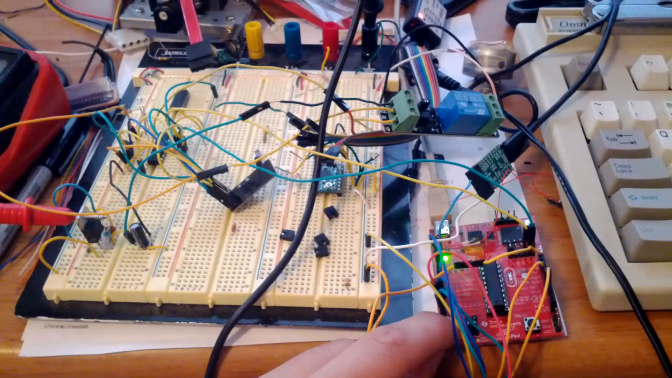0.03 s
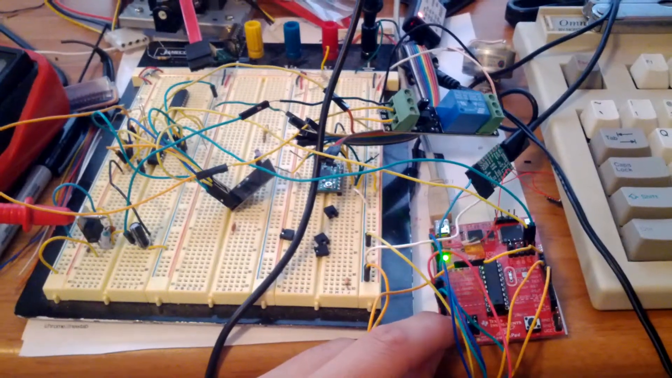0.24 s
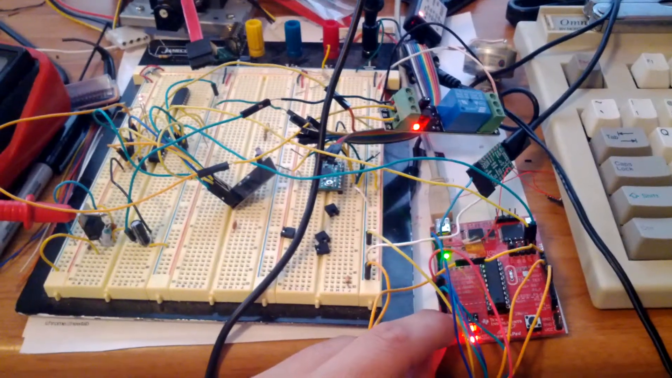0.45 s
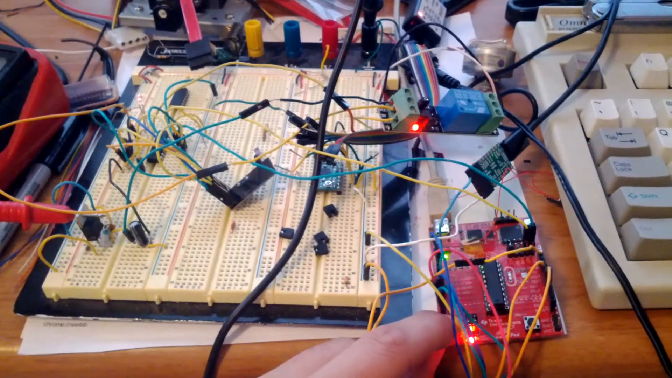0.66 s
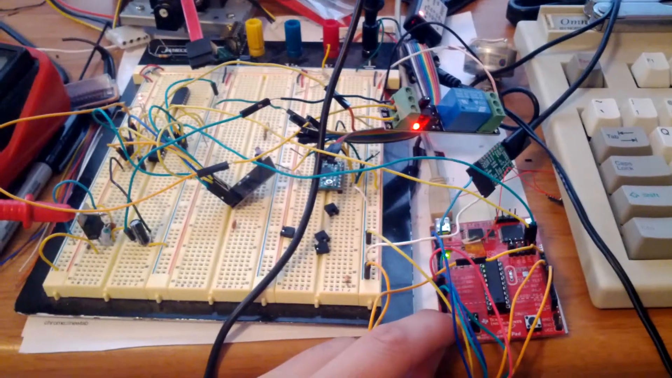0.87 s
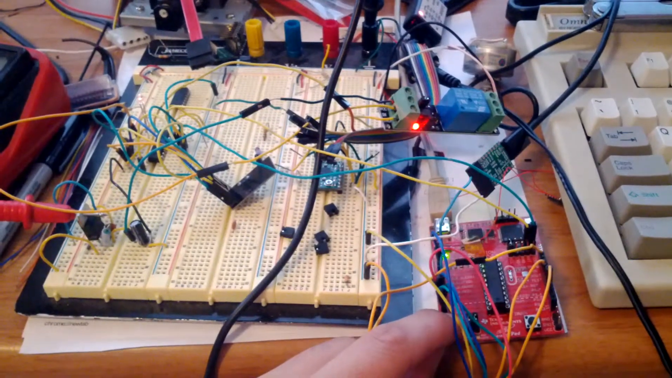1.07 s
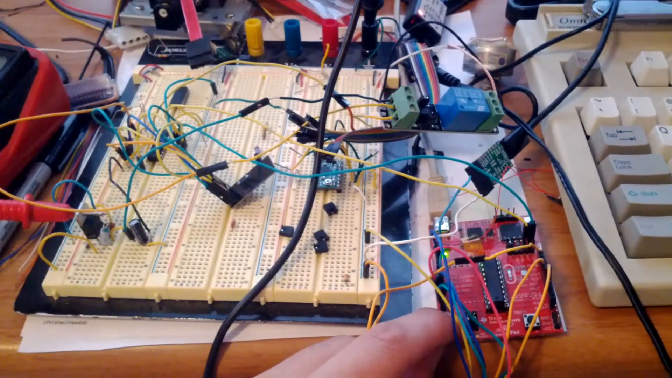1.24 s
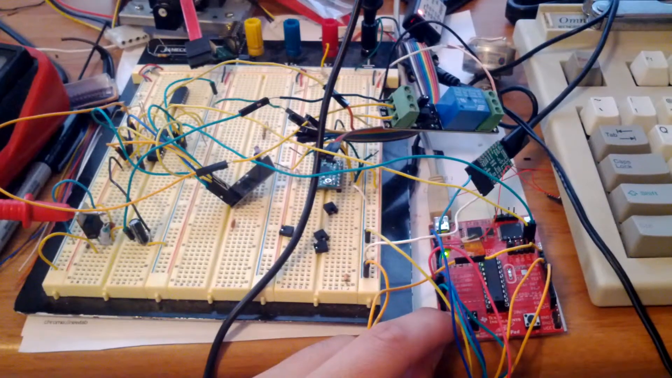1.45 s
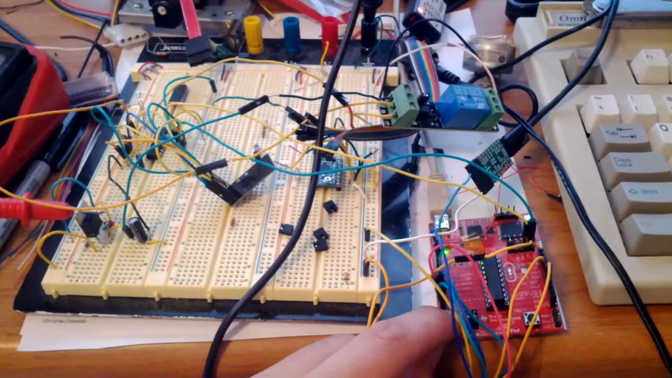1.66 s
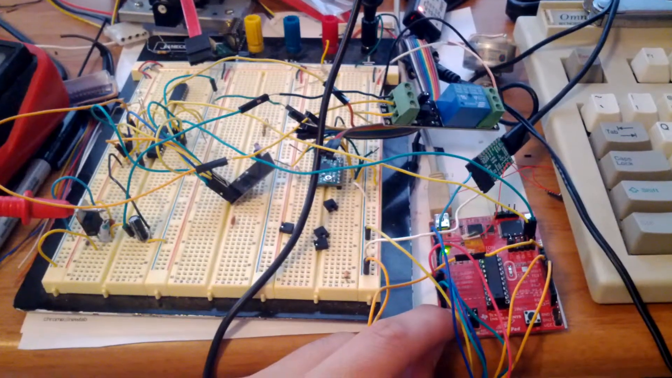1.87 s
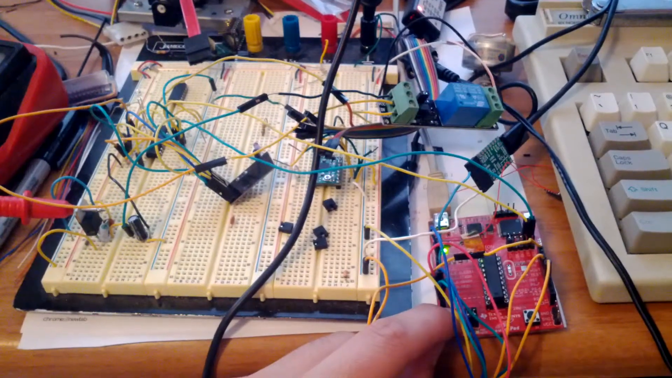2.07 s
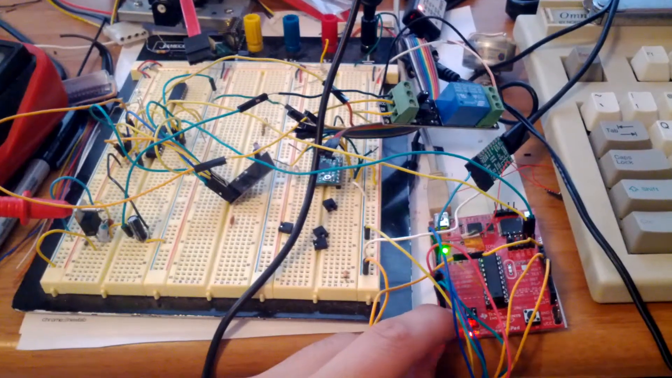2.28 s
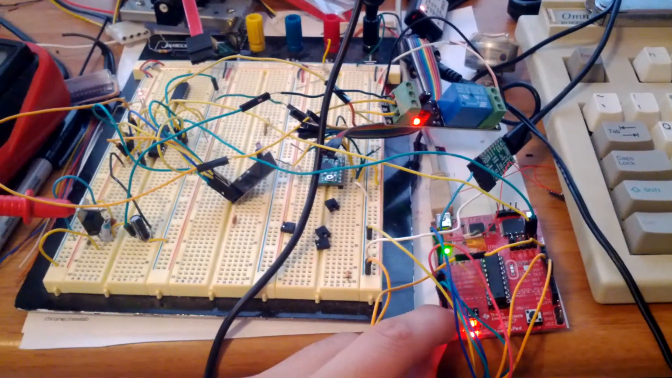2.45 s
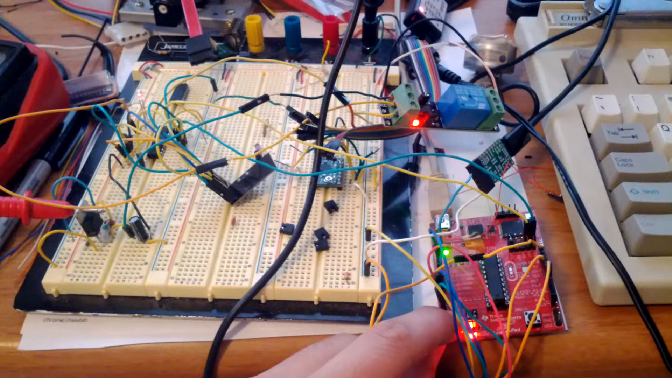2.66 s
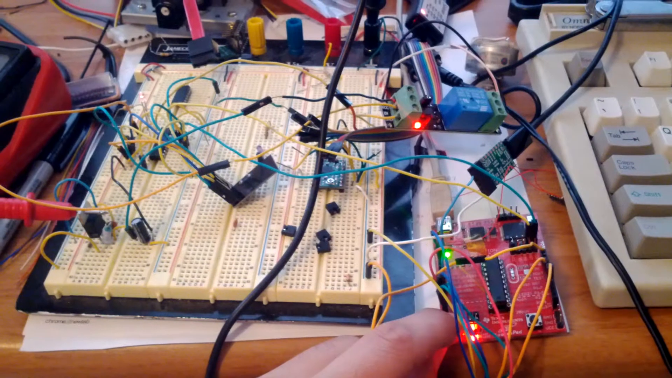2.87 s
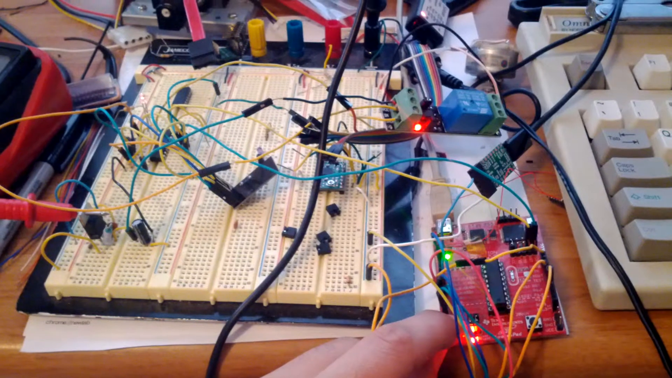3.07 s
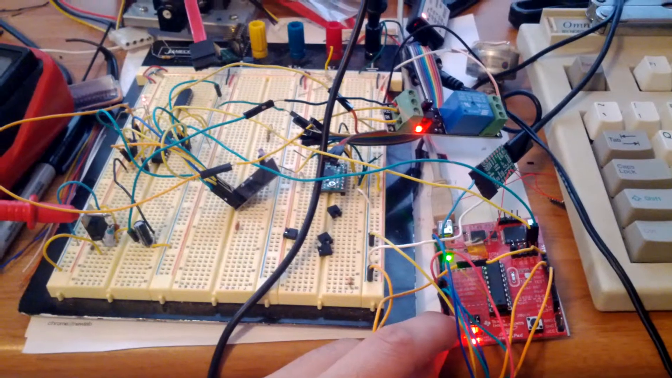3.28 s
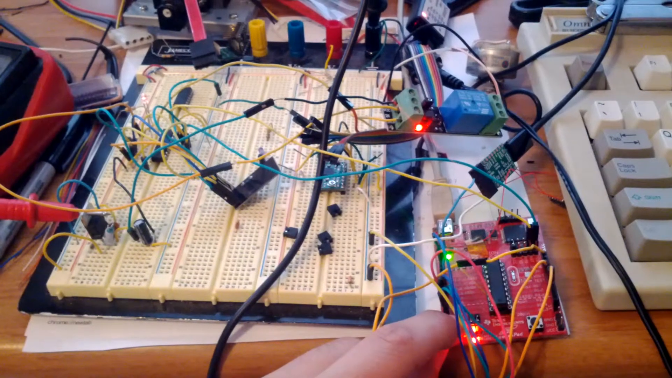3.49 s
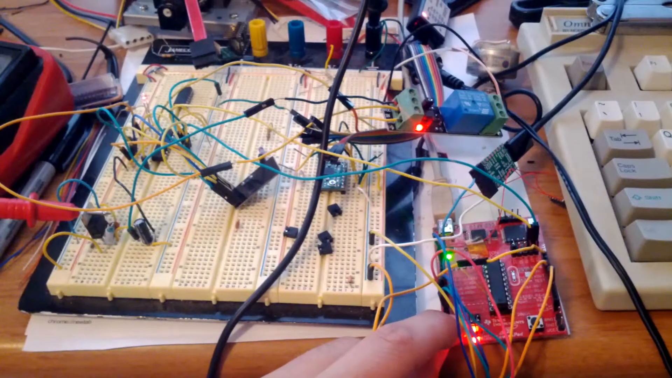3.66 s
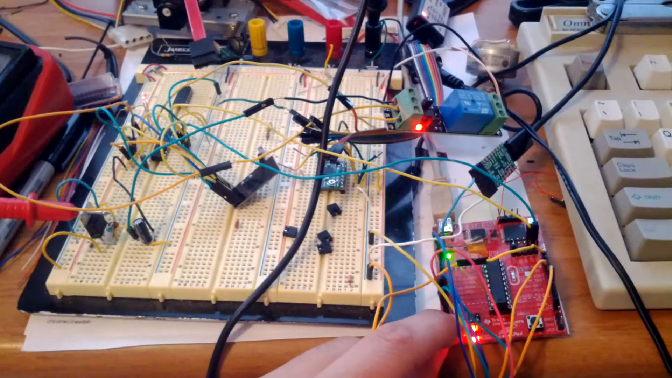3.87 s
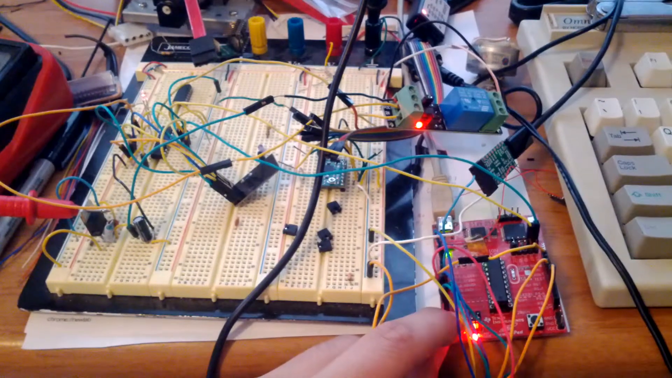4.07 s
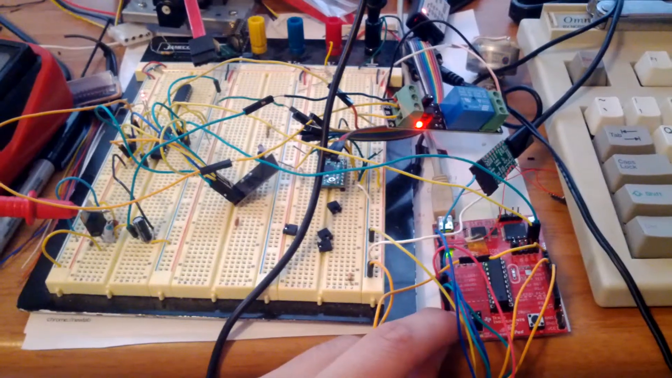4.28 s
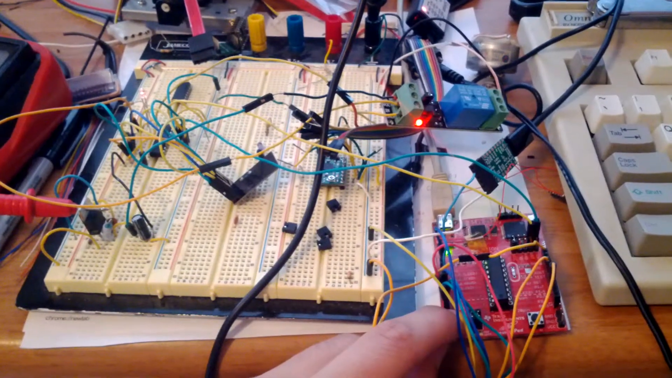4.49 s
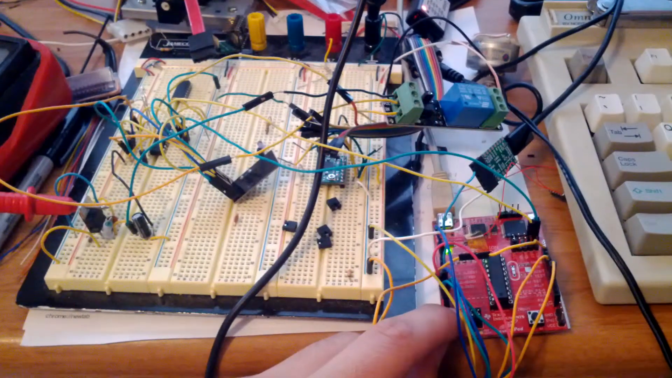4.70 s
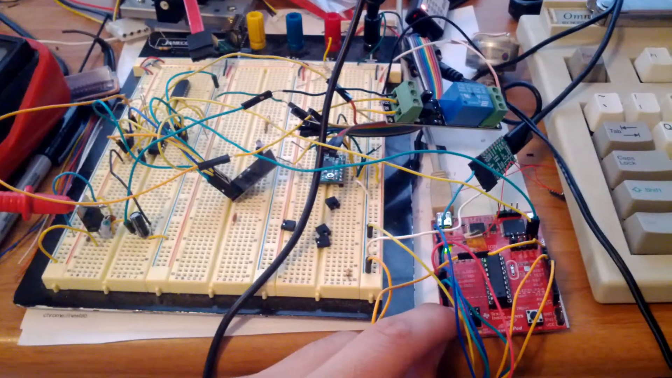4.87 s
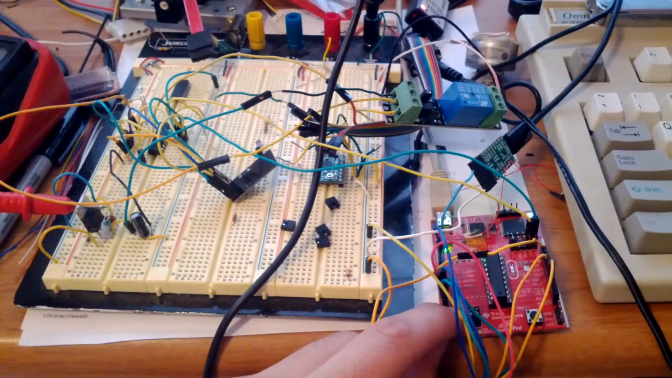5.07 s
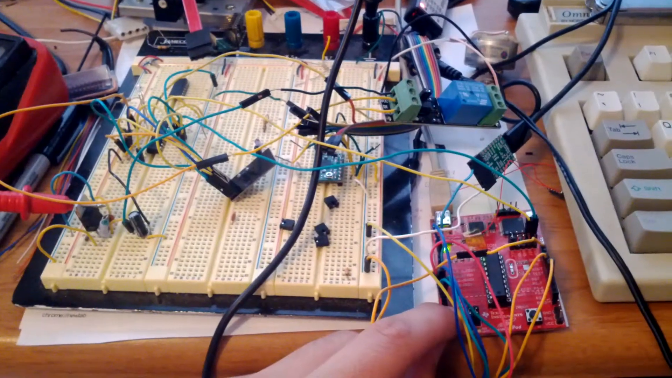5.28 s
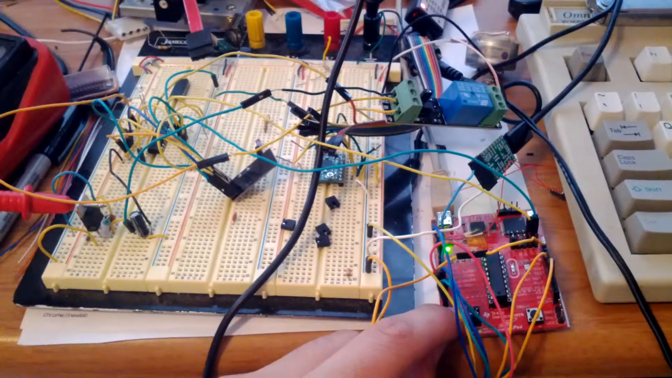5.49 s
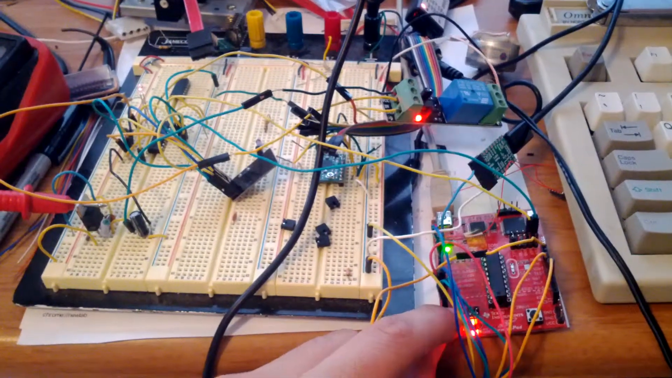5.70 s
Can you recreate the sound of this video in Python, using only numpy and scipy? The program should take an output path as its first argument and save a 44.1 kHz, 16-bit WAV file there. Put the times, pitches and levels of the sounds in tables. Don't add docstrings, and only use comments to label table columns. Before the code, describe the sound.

A close phone microphone at an indoor workbench, with low mains hum, fan rumble and faint hiss throughout. At 0.35 s a finger clicks a metal dome button with a tiny thud; at 0.40 s a small relay cracks shut, bright and dry, and a miniature brush motor leaps to speed in a tenth of a second, a raspy, high, metallic buzz of rapid ticks, about fifty turns a second. The button clicks up at 0.70 s. At 1.15 s the relay drops out with a softer rattle and the motor coasts, its ticks slowing and fading by about 2.1 s. Around 2 s a distant machine starts, rising to a low, wavering drone. A firmer press at 2.31 s and relay crack at 2.36 s begin a longer, steady run; button release at 4.07 s, drop-out at 4.62 s, coasting to rest near 5.6 s. A third press at 5.61 s restarts the motor, cut off while running.

```python
import sys
import numpy as np
from scipy import signal
from scipy.fft import rfft, irfft, next_fast_len
from scipy.io import wavfile
from scipy.ndimage import uniform_filter1d, map_coordinates

SR = 44100
rng = np.random.default_rng(int(sys.argv[2]) if len(sys.argv) > 2 else 0)


def wav_out(sig):
    wavfile.write(sys.argv[1], SR, np.round(np.clip(np.atleast_2d(sig).T, -1, 1) * 32767).astype(np.int16))


def attenuation_scalar(level_db):
    decades = np.asarray(level_db, float) / 20
    return 10 ** decades


N = 253134
T = np.arange(N) / SR

# frequency in Hz, level in dB per Hz.
ROOM_TONE = [(15, -11), (28, 1.5), (40, -23.5), (60, -6.5), (100, -12.5), (160, -9), (330, -16.5),
             (440, -25), (1400, -30), (2000, -33.5), (2400, -37), (5000, -44.5), (10600, -39),
             (15800, -44.5)]
# frequency in Hz, 60 dB decay time in seconds.
BENCH_DECAY = [(500, 0.21), (4000, 0.45), (12000, 0.23)]
# frequency in Hz, level in dB rms, sway in dB.
HUM_LINES = [(28.35, -51, 2), (54.5, -58.5, 5), (60.2, -57, 0.5), (118.5, -61, 2.5), (161.7, -65, 5.5),
             (2015, -72.5, 1.2)]
# time in seconds, level in dB.
MACHINE_SWELL = [(2.2, -45), (2.31, -60), (2.35, -55), (2.68, -41), (2.76, -50.5), (2.9, -42), (3.03, -61),
                 (3.08, -46), (3.4, -41.5), (3.62, -51.5), (4.06, -42.5), (4.68, -52), (5.04, -43),
                 (5.38, -49), (5.42, -60), (5.53, -43), (5.74, -42)]

# time in seconds, strength in dB.
PRESSES = [
    (0.347, -0.5),
    (2.306, 1),
    (5.611, -0.2),
]
# time in seconds, strength in dB.
RELEASES = [
    (0.7027, 2.5),
    (4.074, .5),
]
# delay in ms, tick in dB, thud in dB, thud pitch in Hz, knock in dB.
PRESS_STAGES = [
    (0, -21.5, -37, 1580, -35.5),
    (6.5, -46.5, -43.5, 1400, -52.5),
    (13, -44.5, -40.5, 470, -51.5),
]
# delay in ms, tick in dB, thud in dB, thud pitch in Hz, knock in dB.
RELEASE_STAGE = (0, -33, -43, 1500, -37.5)
# delay in ms, tick in dB, thud in dB, thud pitch in Hz, knock in dB.
MOTOR_KICK = (64.5, -60, -44.5, 755, -48)
# frequency in Hz, level in dB per Hz.
DOME_SPECTRUM = [(1180, -46), (2000, -16), (4460, -33), (5090, -9.5), (6250, -21.5), (9250, -0.5),
                 (10200, -3), (11400, 3.5), (14800, -5.5), (16800, -34)]

# time in seconds, peak in dB.
PULL_INS = [
    (0.4031, -2),
    (2.3626, -2),
    (5.6677, -2),
]
# delay in ms, level in dB.
PULL_IN_BOUNCES = [(0, -1.5), (.3, -17), (1.5, -13), (2.6, -14), (3.2, -18), (5.4, -29), (7.2, -24),
                   (12.4, -19)]
# frequency in Hz, level in dB, 60 dB decay time in seconds.
PULL_IN_MODES = [(3530, -24, 0.0066), (4430, -24, 0.0061), (4880, -18.5, 0.011), (7100, -13, 0.0059),
                 (7510, -10, 0.0072), (8750, -2.5, 0.0074), (9520, 0.5, 0.0043), (10310, -11, 0.0052),
                 (11830, -5, 0.005), (13500, -10.5, 0.0034), (15000, -24.5, 0.0037)]
# frequency in Hz, level in dB per Hz.
FIZZ_SPECTRUM = [(880, -73.5), (1500, -39.5), (3880, -20.5), (4890, -29.5), (6110, -30.5), (6630, -9.5),
                 (8620, 0.5), (12300, -9), (13200, -18), (16100, -20), (16800, -31)]
# time in seconds, peak in dB.
DROP_OUTS = [
    (1.1537, -14),
    (4.615, -14),
]
# delay in ms, level in dB.
DROP_OUT_BOUNCES = [(0, -5), (2.9, -6.5), (5.4, 1), (7.2, -47), (8.8, -4.5), (11.2, -25), (13, -33)]
# frequency in Hz, level in dB, 60 dB decay time in seconds.
DROP_OUT_MODES = [(5190, -4, 0.012), (5860, -3, 0.009), (6090, -3.5, 0.0098), (6960, -2.5, 0.0097),
                  (7500, -4, 0.0068), (8860, 1, 0.0057), (8770, -7.5, 0.0067), (9520, -0.5, 0.009),
                  (10200, -13, 0.0076), (12200, -29, .005)]
# frequency in Hz, level in dB.
RELAY_CASE = [(1200, -28.5), (3000, -20), (4300, -7), (15800, 3.5), (17000, -33)]

# current on in seconds, current off in seconds, rest angle in turns.
MOTOR_RUNS = [
    (.403, 1.1463, .811),
    (2.3624, 4.6151, .89),
    (5.6677, 9, .902),
]
# rebound delay in ms, rebound in dB, its whistle in dB, low ring in dB,
# spring delay in ms.
EDGES = [(.9, 5.5, -22, -16.5, .1), (1, -1.5, -3.5, -18, .9), (1.2, 6.5, -17, -13, 0.082),
         (1.2, -6, -6.5, -11.5, 0.32), (0.69, -11.5, -17, -12, .3), (0.93, -8, -12, -29, .2)]
ANGLE_DRIVEN = [-.05, .13, .325, .42, .62, .805]
ANGLE_FAST = [-.05, .135, .315, .455, .62, .805]
ANGLE_SLOW = [-.002, .15, .33, .485, .662, .825]
# under current in dB, gain once bedded in dB, coasting in dB,
# fades below this speed in turns a second.
EDGE_STRIKE = [(-31.5, 0, -28.5, 2.5), (-30.5, 2, -27, 13.5), (-42.5, 7, -28.5, 14), (-36.5, 5, -31, 14),
               (-37.5, 3.5, -32, 2.6), (-28, -1, -30, 21)]
# under current in dB, gain once bedded in dB, coasting in dB.
EDGE_SONG = [(-30.5, 1, -31.5), (-33.5, -5.5, -33), (-52, -3, -42), (-42.5, 5.5, -32.5),
             (-37.5, -4.5, -46.5), (-37.5, 3, -33)]
# frequency in Hz, 60 dB decay time in seconds.
SPRING_MODES = [
    (11920, .014),
    (13480, .0048),
    (7850, .009),
    (8450, .007),
    (10600, .006),
    (7080, .011),
]
# frequency in Hz, level in dB.
BRUSH_CAP = [(5500, -21), (7200, -2.5), (13900, 0.5), (14900, -9), (16000, -19.5)]
# frequency in Hz, level in dB per Hz.
MOTOR_CAN = [(700, -46.5), (1000, -36), (1800, -21.5), (2500, -26.5), (3800, -29), (5400, -21),
             (6400, -18.5), (8100, -6), (9300, -11.5), (10800, -5), (12500, -7), (13800, -19),
             (14800, -24.5), (15800, -30)]
# multiple of shaft speed, level in dB rms.
SHAFT_ORDERS = [(6, -68), (7, -56), (10, -71.5), (14, -70), (30, -75), (31, -77), (34, -71.5), (35, -82),
                (36, -70.5), (38, -83), (46, -68), (52, -72.5), (56, -72.5), (104, -67), (106, -69),
                (114, -66)]
# frequency in Hz, level in dB per Hz.
BEARING_RUB = [(900, -16.5), (1700, 2), (2600, -2.5), (3300, -9), (4500, -1.5), (6000, -4.5), (7500, -3.5),
               (9000, -31)]

MACHINE_ON_S, MACHINE_RISE_S = 1.95, 0.62
MACHINE_HZ, MACHINE_LAG_HZ, MACHINE_SETTLE_S = 77.35, 8.5, .3
TOP_SPEED, SPIN_UP_S = 52.2653, .04595
DRY_DRAG, COAST_S = 91.577, 2.17486
BED_IN_S, BED_SPREAD_S = 0.66, 0.058
SOFTEN_DB, FADE_POWER = 11, 5.5
START_DB, START_S = 8.5, 0.039


def unit(x):
    return x / np.sqrt(np.mean(x ** 2) + 1e-20)


def along(points, hz):
    f, v = np.transpose(points)
    return np.interp(np.log(hz + 1), np.log(f + 1), v)


def wobble(rate):
    return map_coordinates(rng.standard_normal(int(N * rate / SR) + 4), [T * rate])


def noise(count=N):
    return rng.standard_normal(count)


def sine(hz, t):
    return np.sin(2 * np.pi * hz * t)


def coloured(x, spectrum):
    m = next_fast_len(len(x) + 8192)
    gain = attenuation_scalar(along(spectrum, np.fft.rfftfreq(m, 1 / SR)))
    y = irfft(rfft(x, m) * gain, m)[:len(x)]
    return unit(y) * np.sqrt(np.mean(x ** 2))


def dying(t60, seconds=.06):
    t = np.arange(int(seconds * SR)) / SR
    return t, attenuation_scalar(-60 * t / t60)


def struck(times, db, sound):
    blows = np.bincount(np.round(np.asarray(times) * SR).astype(int), attenuation_scalar(db), N + SR)
    return signal.fftconvolve(blows[:N], sound)[:N]


def machine_up():
    return np.clip((T - MACHINE_ON_S) / MACHINE_RISE_S, 0, 1)


def air():
    level_db = -58 + 3.5 * machine_up() - 9 * np.exp(-T / 0.12)
    hiss = attenuation_scalar(-52) * coloured(noise(), ROOM_TONE)
    rumble = coloured(noise(), [(60, -29.5), (150, 6.5), (260, -2.0), (400, -7.5), (900, -21), (3000, -54.5)])
    return hiss + attenuation_scalar(level_db + 2.2 * wobble(6)) * rumble


def drone():
    hum = np.zeros(N)
    for hz, db, sway in HUM_LINES:
        hum += attenuation_scalar(db + 1.0 + sway * wobble(4.94)) * np.sin(2 * np.pi * (hz * T + rng.random()))
    lag = np.exp(-np.maximum(T - MACHINE_ON_S, 0) / MACHINE_SETTLE_S)
    turns = np.cumsum(MACHINE_HZ - MACHINE_LAG_HZ * lag) / SR
    swell_db = np.interp(T, *np.transpose(MACHINE_SWELL))
    levels = [-45.5 + 1.2 * wobble(6.4), swell_db + 2.6 + 1.5 * wobble(16), -59 + 3 * wobble(6.5)]
    far = sum(attenuation_scalar(db) * sine(order, turns) for order, db in enumerate(levels, 1))
    return hum + far * machine_up()


def bench(x):
    hz, t, z = signal.stft(noise(SR // 3), SR, nperseg=256)
    tail = signal.istft(z * attenuation_scalar(-60 * t / along(BENCH_DECAY, hz)[:, None]), SR, nperseg=256)[1]
    return signal.fftconvolve(np.pad(x, (120, 0)), tail / np.linalg.norm(tail))[:N]


def button():
    out = np.zeros(N + SR)
    t, fall = dying(0.008, seconds=.08)
    touches = [(s, db, stage) for s, db in PRESSES for stage in PRESS_STAGES]
    touches += [(s, db, RELEASE_STAGE) for s, db in RELEASES]
    touches += [(s, 0, MOTOR_KICK) for s, _ in PULL_INS]
    for s, db, (ms, tick_db, thud_db, hz, knock_db) in touches:
        tick = coloured((fall + attenuation_scalar(-31.0 - 60 * t / 0.13)) * noise(len(t)), DOME_SPECTRUM)
        tick = tick + .2 * attenuation_scalar(-60 * t / .009) * sine(5300, t)
        board = [(0.1 * hz, -20), (.5 * hz, -4), (hz, 0), (1.14 * hz, -8), (3 * hz, -30)]
        thud = coloured(attenuation_scalar(-60 * t / 0.061) * noise(len(t)), board)
        knock = coloured(fall ** 2 * noise(len(t)),
                         [(600, -7), (2000, -9.5), (4200, -5.5), (5400, 3), (8000, -6.5)])
        touch = attenuation_scalar(tick_db - 3) * tick + attenuation_scalar(thud_db - 7.0) * thud + attenuation_scalar(knock_db + 3.5) * knock
        out[round((s + ms / 1000) * SR):][:len(t)] += attenuation_scalar(db) * touch
    return out[:N]


def contact(modes, bounces, attack):
    t = dying(1)[0]
    out = np.zeros(2 * len(t))
    for ms, bounce_db in bounces:
        hit = sum(attenuation_scalar(db + rng.normal(0, 1.3) - 60 * t / t60) * sine(hz, t) for hz, db, t60 in modes)
        out[int(ms * SR / 1000):][:len(t)] += attenuation_scalar(bounce_db) * hit * (1 - np.exp(-t / attack))
    return out / np.abs(out).max()


def relay():
    t = dying(1, seconds=.12)[0]
    fizz = coloured(noise(len(t)), FIZZ_SPECTRUM) * attenuation_scalar(-60 * t / 0.41 - 33.5) * (1 - np.exp(-t / 0.00081))
    crack = contact(PULL_IN_MODES, PULL_IN_BOUNCES, 0.00023)[:len(t)]
    shut = coloured(crack, RELAY_CASE) + fizz
    drop = coloured(contact(DROP_OUT_MODES, DROP_OUT_BOUNCES, .00009), RELAY_CASE)
    return struck(*np.transpose(PULL_INS), shut) + struck(*np.transpose(DROP_OUTS), drop)


def shaft():
    speed, turns, driven, running = np.zeros((4, N))
    for on, off, rest in MOTOR_RUNS:
        spin_up = TOP_SPEED * (1 - np.exp(-np.maximum(T - on, 0) / SPIN_UP_S))
        coast = (TOP_SPEED + DRY_DRAG) * np.exp(-np.maximum(T - off, 0) / COAST_S) - DRY_DRAG
        run = np.where(T < off, spin_up, np.maximum(coast, 0))
        speed += run
        turns = np.where(T >= on, rest + np.cumsum(run) / SR, turns)
        driven += (T >= on) & (T < off)
        running = np.where(T >= on, T - on, running)
    return speed, turns, uniform_filter1d(driven, size=600), running


def brushes(speed, turns, running, bedded, loaded):
    ticks, rings, gate = np.zeros((3, N))
    t = dying(1, seconds=.03)[0]
    swell = 1 - np.exp(-t / 0.000098)
    main, whistle, low, mid, high, idle = [attenuation_scalar(-60 * t / t60) * sine(hz, t) * swell for hz, t60 in SPRING_MODES]
    low = low + attenuation_scalar(-3.0) * mid + high
    edges = zip(EDGES, ANGLE_DRIVEN, ANGLE_FAST, ANGLE_SLOW, EDGE_STRIKE, EDGE_SONG)
    for edge, on, fast, slow, strike, song in edges:
        delay_ms, rebound_db, whistle_db, low_db, sing_ms = edge
        place = slow + (fast - slow) * speed / 52 + (on - fast) * loaded
        at = np.flatnonzero((np.diff(np.floor(turns - place)) > 0) & (speed[1:] > 1))
        pace, load = speed[at] / 52, loaded[at]
        slow_db = SOFTEN_DB * np.log10(pace) - 20 * np.log10(1 + (strike[3] / speed[at]) ** FADE_POWER)
        slow_db = slow_db - START_DB * np.exp(-running[at] / START_S)
        tick_db, ring_db = [(idle_db + loaded * (on_db + gain_db * bedded - idle_db))[at] + slow_db
                            for on_db, gain_db, idle_db in (strike[:3], song)]
        db = tick_db + 0.54 * wobble(4.07)[at] + 0.5 * wobble(60)[at]
        back_db = db + 12 * np.log10(pace + 1e-3) - 5.5 * (1 - load)
        first = T[at] + .000008 * (3 + wobble(12)[at])
        back = first + delay_ms / 1000
        snap = attenuation_scalar(-60 * t / .0012) * rng.choice([-1, 1], len(t)) * rng.uniform(.6, 1.4, len(t))
        snap *= 2.45 / np.linalg.norm(snap)
        ticks += struck(first, db, snap) + struck(back, back_db + rebound_db, -snap)
        gate += struck(first, db, attenuation_scalar(-60 * t / 0.015))
        sing_db = ring_db + 1.5 * wobble(3.5)[at] + wobble(30)[at] + 1.5
        sung = first + sing_ms / 1000 * pace
        rings += struck(sung, sing_db, main)
        rings += struck(sung, db + whistle_db + 4.5, whistle)
        rings += struck(first, db + low_db - 2.0 - 7 * load, idle)
        rings += struck(first, db + low_db + .6 + 2.8 * bedded[at] * load, low)
    return ticks, rings, gate


def shaft_hum(speed, turns, running):
    hum = np.zeros(N)
    for k, db in SHAFT_ORDERS:
        level = attenuation_scalar(db + 1.5 + 1.5 * wobble(2.21)) * (speed / 52.23) ** (5 + .8 * k)
        settled = 1 - np.exp(-running / (.02 + 0.0038 * k))
        hum += level * settled * np.sin(2 * np.pi * (k * turns + rng.random() + 0.05 * wobble(18)))
    return hum


def bearing_rub(speed, turns, loaded):
    rough = noise(400)
    surface = np.interp(turns % 1 * len(rough), np.arange(len(rough)), rough) * (speed / 52) ** 4
    slide = 1.17 * noise() * np.tanh(speed / 19) * (1.4 - 0.46 * loaded)
    return attenuation_scalar(-64.0 + wobble(6.8)) * coloured(surface + slide, BEARING_RUB)


def motor():
    speed, turns, driven, running = shaft()
    bedded = (1 + np.tanh((running - BED_IN_S) / BED_SPREAD_S)) / 2
    loaded = driven * (speed / TOP_SPEED) ** 6.5
    ticks, rings, gate = brushes(speed, turns, running, bedded, loaded)
    scrape = (0.15 * gate + attenuation_scalar(-56) * speed / 52) * noise()
    sizzle = coloured((0.15 * gate + attenuation_scalar(-52) * speed / 52) * noise(), [(13500, -30), (14600, .5), (15800, -3.0)])
    brush = attenuation_scalar(-1.5) * coloured(ticks + scrape, MOTOR_CAN) + attenuation_scalar(1.0) * coloured(rings, BRUSH_CAP)
    hum = shaft_hum(speed, turns, running)
    return attenuation_scalar(-15) * sizzle + brush + hum + bearing_rub(speed, turns, loaded)


def scene():
    near = motor() + relay() + button()
    return (near + attenuation_scalar(-18.5) * bench(near) + drone() + air())[None]


def top_cut(x):
    return signal.sosfilt(signal.butter(12, 17340, fs=SR, output="sos"), x)


def record(dry):
    mix = coloured(dry[0], [(15700, 0), (15950, -27.0), (17200, -25), (17400, -78.5)])[None]
    return top_cut(mix)


dry = scene()
out = record(dry)
wav_out(out)
```